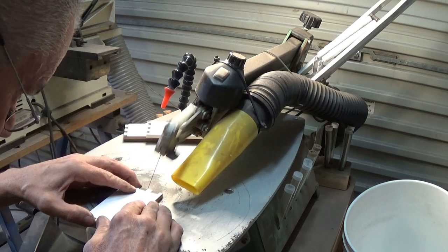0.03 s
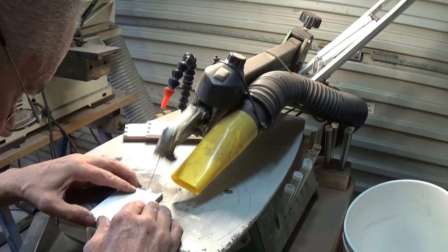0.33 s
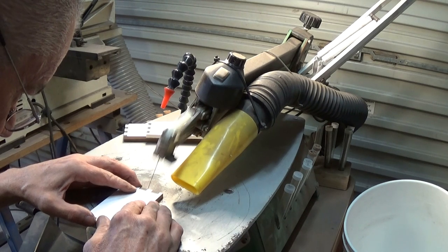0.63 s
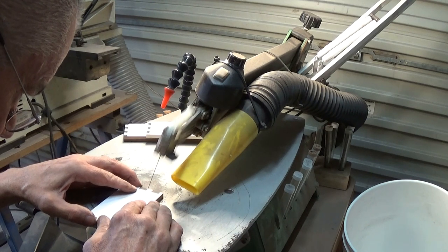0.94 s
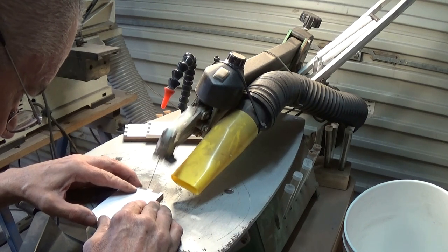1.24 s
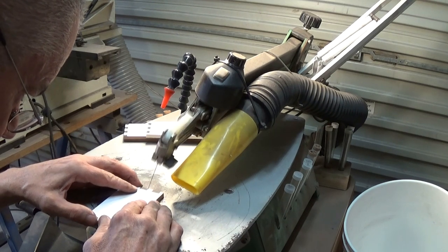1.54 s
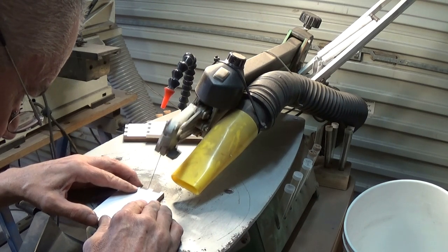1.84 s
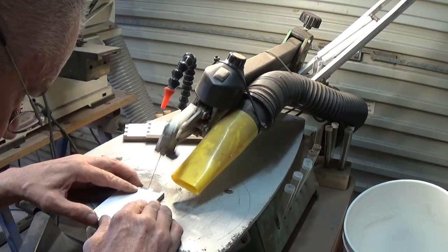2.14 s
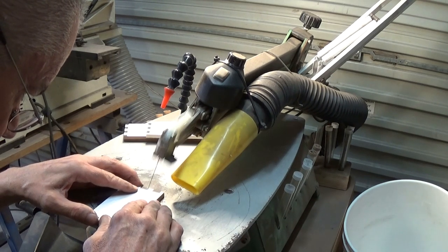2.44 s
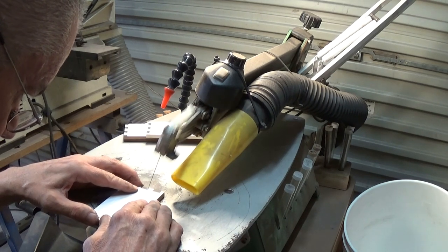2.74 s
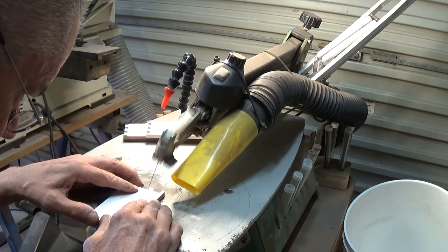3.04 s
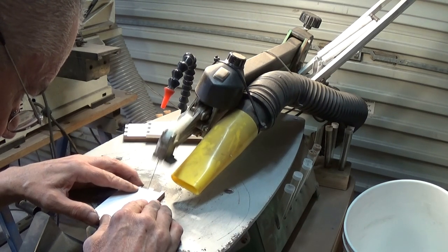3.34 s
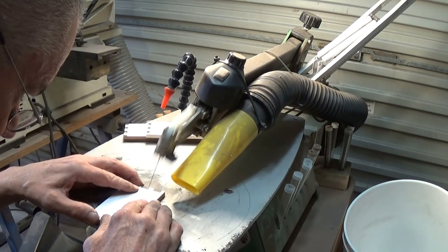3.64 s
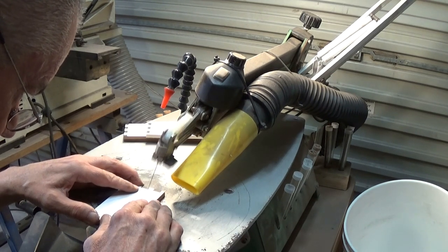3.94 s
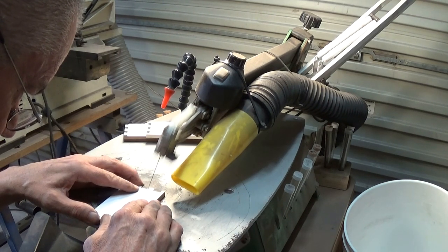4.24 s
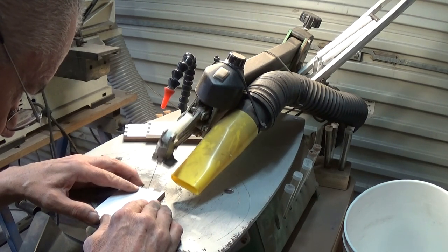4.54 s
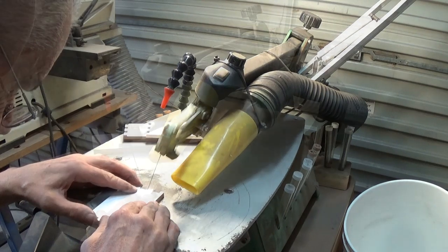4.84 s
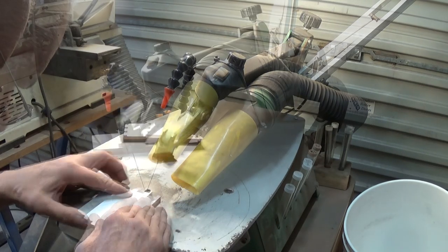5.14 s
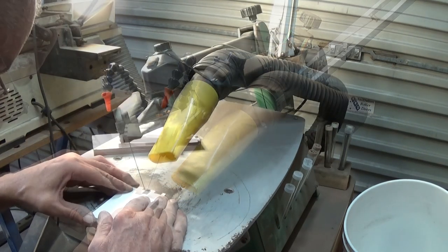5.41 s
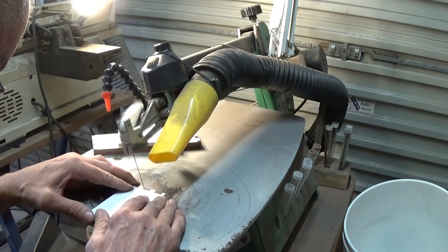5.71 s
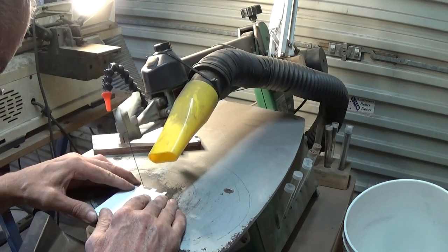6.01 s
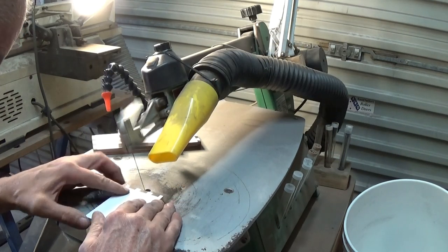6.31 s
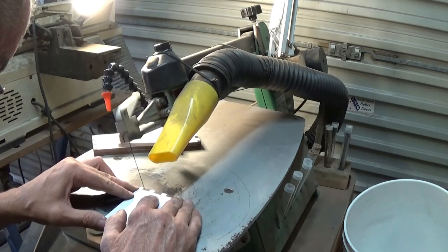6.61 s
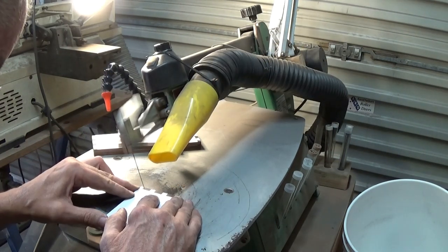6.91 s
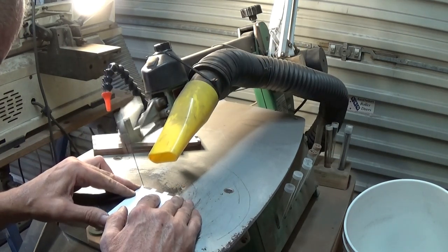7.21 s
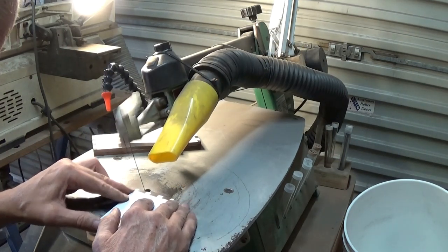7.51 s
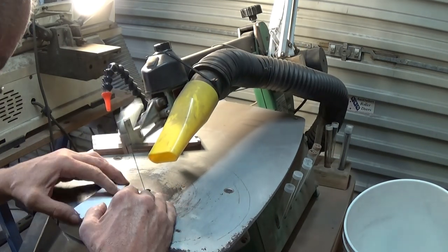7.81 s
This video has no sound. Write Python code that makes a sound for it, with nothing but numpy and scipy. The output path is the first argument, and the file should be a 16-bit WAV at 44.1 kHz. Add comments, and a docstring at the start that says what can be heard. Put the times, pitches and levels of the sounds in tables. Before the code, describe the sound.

Close up in a small workshop, a scroll saw blade rasps up and down through thin wood in rapid strokes while the frame hums, the piece rattles and fibres occasionally snap. The steady cut then fades into a sped-up version of the saw, its strokes merged into a high buzz. Three bright cutting bursts follow, the first brief and faint, before it drops to a quiet idle.

```python
"""A scroll saw cuts thin wood in a small workshop, about 16 crank turns a second: the blade rasps on each
up and down stroke, the wood chatters on the table, the frame hums at multiples of the crank speed.
At 4.7 s the blade comes free and the sound dissolves, over a second, into the same saw sped up about
six times: the strokes merge into a buzzing whine with three bursts of bright cutting."""
import sys
import numpy as np
from scipy import signal
from scipy.fft import rfft, irfft
from scipy.io import wavfile
from scipy.ndimage import uniform_filter1d

SR = 44100
rng = np.random.default_rng(int(sys.argv[2]) if len(sys.argv) > 2 else 0)


def persist_wave(psi):
    """Save psi, clipped to +-1, as 16-bit WAV."""
    counts = np.round(np.clip(psi, -1, 1) * 32767).astype(np.int16)
    wavfile.write(sys.argv[1], SR, np.atleast_2d(counts).T)


N = 346626
T = np.arange(N) / SR

# stereo width (frequency [Hz], relative side level [dB])
SPREAD = [(60, -50), (160, -42), (270, -41), (450, -26), (740, -11), (1220, -12.5), (2010, -13),
          (3330, -12), (5500, -9.5), (9080, -13), (15000, -29)]
FAST_SPREAD = [(60, -20), (200, -24), (380, -33), (1290, -51), (2380, -51), (4400, -19.5), (8120, -7.5),
               (15000, -16)]
# balance (frequency [Hz], left minus right [dB])
BALANCE = [(450, 0), (740, -.5), (1220, .3), (2010, .5), (3330, -.4), (5500, 1.8), (9080, 1.3), (15000, .5)]
# steady motor tones (frequency [Hz], rms level [dB])
MOTOR = [(100, -99), (300, -88), (500, -78.5)]
FAST_MOTOR = [(499, -95.5), (705, -86), (1122, -81.5), (1305, -88), (1803, -89), (2401, -85.5)]
# frame hum (time [s], drone level [dB], thump level [dB])
HUM_LEVELS = [(0.0, -75.5, -91), (.9, -75.5, -89), (1.1, -73, -93), (2.2, -72, -85), (3.22, -74, -88),
              (3.42, -77, -78), (4.7, -74, -79.5), (5.5, -78, -78.5)]
# brief drone dips (time [s], depth [dB])
DRONE_DIPS = [(.04, -11), (.5, -11), (3.32, -16)]
# frame vibration and blade singing (crank multiple, relative level [dB])
DRONE_ORDERS = [(5, -5), (8, -38), (9, -27), (10, -27), (11, 3), (12, -36), (13, -11), (14, -15.5),
                (15, -15), (16, -10), (17, -28)]
THUMP_ORDERS = [(4, -13), (5, 0), (6, 0), (7, 0.5), (8, -1.5)]
FAST_HUM_ORDERS = [(3, -90.5), (4, -86.5), (5, -90), (6, -80), (7, -91.5), (9, -105), (11, -102.5),
                   (12, -98.5), (13, -104), (14, -95), (20, -78)]
SING_ORDERS = [(21, 2), (32, -15), (33, -14.5), (36, -7), (41, -10)]
# splinters (time [s], peak [dB])
SNAPS = [(0.39, -31), (2.162, -38), (3.026, -32), (4.967, -43), (6.396, -55), (6.623, -64), (6.633, -61),
         (6.815, -43), (6.824, -50)]
# blade squeaks (time [s], length [s], nominal pitch [Hz], level [dB])
SQUEAKS = [(4.958, 0.08, 932, -64.5), (4.989, 0.055, 2105, -65), (5.015, 0.09, 2150, -72),
           (6.568, 0.038, 12700, -64), (7.528, 0.029, 6400, -63.5), (7.525, 0.029, 12640, -65)]

# resonances (frequency [Hz], width [Hz], relative level [dB])
FRAME_MODES = [(375.4, 8.7, 4), (347, 11, -12), (256, 26, -20.5)]
WOOD_MODES = [(480, 15, -21), (491, 51, -8), (575, 41, -8.5), (609.7, 11.7, 5), (656, 14, 3.5),
              (714, 17, -5.5), (836.4, 19.5, -1), (935.7, 19.6, 5), (1036, 57, -2), (1080, 30, -6)]
ARM_MODES = [(1246, 16, -8.5), (1335, 18.6, -1.5), (1702, 30, -10), (2343, 20, -10), (3607, 20, -13.5)]
TABLE_MODES = [(1425, 76, -3.5), (1618, 23, -2), (1663, 11, -2.5), (1849, 52, 1), (2164, 16, -1.5),
               (2296, 39, 3), (2394, 12, 3)]
GUIDE_MODES = [(2523, 21, -6), (2784, 66, -3), (3220, 65, -2), (3576, 39, 1.5), (3843, 26, 1)]
BLADE_MODES = [(3700, 31, -1), (4720, 13, 8), (4836, 41, -5.5), (4987, 110, 0.5), (5460, 89, -3.5),
               (5900, 156, -3), (6446, 11, 3.5), (6860, 49, -3.5)]
TEETH_MODES = [(7710, 130, 0), (7720, 110, -2.5), (7900, 50, -1.5), (8360, 380, -2), (8900, 160, 0.5),
               (9330, 290, 0), (10100, 520, -6), (10740, 410, -10), (12220, 350, -14), (13600, 480, -18)]
FAST_FRAME_MODES = [(1966, 88, -6), (2000, 25, -24), (2165, 40, -2.5), (2230, 27, 8)]
FAST_WOOD_MODES = [(4960, 140, -10), (5470, 200, -10), (5790, 160, -0.5), (6145, 84, 4.5), (6550, 220, -7)]
FAST_ARM_MODES = [(7290, 210, -5), (7500, 200, -12), (8140, 220, 0.5), (8750, 170, -8)]
FAST_TABLE_MODES = [(2950, 33, -9), (3110, 45, -7), (3430, 40, -1.5), (3700, 44, -9), (3568, 38, -1),
                    (3740, 31, 3.5), (3700, 50, -5.5), (4110, 44, -8), (4250, 56, -0.5)]
FAST_BLADE_MODES = [(9950, 440, -7.5), (10500, 200, -3.5), (10980, 290, -7.5), (12000, 300, -9),
                    (12900, 300, -9.5), (13820, 110, 3.5), (15100, 1200, -11.5)]
# broad spectra (frequency [Hz], relative level [dB])
WOOD_BED = [(20, -49), (60, -25), (200, -14.5), (300, -50), (450, -16), (770, -27), (1100, -39),
            (1400, -50), (2500, -82)]
TABLE_BED = [(500, -56), (900, -15.5), (1200, -13), (2000, -12.5), (2500, -38), (3500, -21), (9000, -35)]
BLADE_BED = [(700, -43.5), (1500, -23.5), (2600, -16.5), (3400, -6.5), (4300, -13), (5400, -8.5),
             (6300, -14), (7200, -9), (9000, -40), (16000, -79)]
TEETH_BED = [(2000, -35.5), (5000, -10), (7100, -14), (8700, -20), (9800, -20), (11500, -27), (13500, -24),
             (14300, -47), (16000, -33)]
FAST_BLADE_BED = [(1200, -44), (2500, -21), (5000, -23.5), (9000, -21.5), (12500, -17.5), (16000, -13.5)]
FAST_IDLE_BED = [(20, -26), (100, -28), (220, -16.5), (400, -7), (800, -5), (1200, -1), (1650, 2),
                 (2100, -0.5), (3200, 0.5), (6500, -3), (9000, -7), (16000, -4.5)]

# crank (time [s], speed [turns/s])
CRANK = [(0.0, 15.96), (0.3, 16.08), (0.5, 15.79), (0.75, 15.9), (1.0, 16.14), (1.4, 16.05), (1.6, 16.16),
         (1.9, 16.02), (2.1, 16.3), (2.5, 16.11), (3.0, 16.26), (3.3, 16.37), (3.6, 16.56), (4.0, 16.61),
         (4.4, 16.66), (4.7, 16.74), (5.4, 16.65)]
# wood feed (time [s], cutting effort [dB], return against cutting stroke [dB])
FEED = [(0.0, 1.5, -.5), (.4, 2, -0.5), (.55, 0.5, -0.5), (1.35, .5, -2), (2.8, -1.06, -0.5),
        (3.3, -1, -2.5), (3.7, -1.5, -2), (4.2, 0, -1), (4.42, -3, 0), (4.58, -2, 0.5), (4.7, -3.5, 2)]
# play of the wood under the hands (time [s], looseness [dB])
LOOSENESS = [(0.0, 4), (.1, -2), (.35, -3.5), (.42, 1.5), (.7, -.5), (.9, 1), (1.15, -1.5), (1.33, 2.5),
             (1.55, -1), (1.83, 2.5), (2.35, -2), (2.65, 2), (2.88, -1), (3.1, 2.5), (3.6, -0.5),
             (3.85, -3), (4.2, -3), (4.7, -6)]
# wood presses the blade sideways, the arm rings (start [s], end [s], boost [dB])
BINDS = [(0.024, 0.3, 3), (3.198, 4.33, 5)]
# shaken parts, by name (level [dB], effort slope [dB/dB], looseness slope [dB/dB], free level [dB])
PARTS = dict(rasp=(-48.5, 1, 0, -66), blade=(-50.5, 1, 0, -70), table=(-52, 1, 0.78, -67),
         arm=(-56.5, 0.5, -0.37, -72), chatter=(-58, -0.43, 1.5, -69.5), boom=(-66, -1, 1.6, -72.5))
# sped-up cuts (start [s], end [s], teeth hiss [dB], arm rasp [dB], wood whistle [dB], wood rattle [dB],
# frame buzz [dB], blade singing [dB], entry rasp boost [dB], exit rasp boost [dB], rattle peak [s])
FAST_CUTS = [(4.848, 5.132, -51, -60, -57.5, -62.5, -64, -80, 7, 7, 4.93),
             (5.509, 6.28, -49.5, -60.5, -57.5, -60, -63, -65.5, 6.5, 1, 6.0),
             (6.642, 7.48, -50, -58, -55.5, -61.5, -62, -79, 5, 11, 7.18)]

CUT_END_S, CUT_RELEASE_S, CLEARING_DB_PER_S = 4.685, 0.081, 15
DISSOLVE_START_S, DISSOLVE_END_S = 4.67, 5.664
FAST_CRANK_HZ, FAST_SAG_HZ = 105.1, 0.75
IDLE_DB, WHINE_FREE_DB, WHINE_LOAD_DB, WHINE_LAG_S = -68.5, -79, 10, 0.26
BRUSH_S, ATTACK_S, RELEASE_S, SETTLE_S = 0.053, 0.023, 0.02, 0.14
BRUSH_DB, SAG_DB, LET_GO_DB, FREE_DB = -13, -1.5, -18.5, -32.5
ENTRY_S, EXIT_S, EDGE_WIDTH_S = 0.081, 0.035, 0.038
WHISTLE_ARCH_DB, SING_ARCH_DB, RATTLE_SWELL_DB = 6, 8, 11
CUTOFF_HZ = 15780


def amp(db):
    """Decibels to gain."""
    return 10 ** (np.asarray(db) / 20)


def unit(x):
    """Scales to rms 1."""
    return x / np.sqrt(np.mean(x ** 2) + 1e-20)


def curves(rows):
    """Each value column of a time table at every sample."""
    times_s, *columns = np.transpose(rows)
    return [np.interp(T, times_s, column) for column in columns]


def ramp(start_s, end_s):
    """Linear rise from 0 to 1."""
    return np.clip((T - start_s) / max(end_s - start_s, .001), 0, 1)


def bump(at_s, width_s):
    """Bell of height 1."""
    return np.exp(-((T - at_s) / width_s) ** 2)


def spectrum_db(points, hz):
    """Interpolates a spectrum over log frequency."""
    points_hz, db = np.transpose(points)
    return np.interp(np.log(hz + 1), np.log(points_hz + 1), db)


def wander(rate_hz):
    """Smooth random curve, rms 1."""
    return unit(np.interp(T * rate_hz, np.arange(4000), rng.standard_normal(4000)))


def tones(turns, orders):
    """Sines at multiples of a running phase."""
    return sum(np.sqrt(2) * amp(db) * np.cos(2 * np.pi * k * turns) for k, db in orders)


def add(mix, at_s, sound):
    """Mixes a sound in at a time."""
    part = mix[round(at_s * SR):][:len(sound)]
    part += sound[:len(part)]


def body(x, modes=(), bed=((1, -90), (2, -90)), size=8192):
    """Rings x through resonances on a broad spectrum; minimum phase, rms 1."""
    hz = np.fft.rfftfreq(size, 1 / SR)
    power = amp(spectrum_db(bed, hz)) ** 2
    for mode_hz, width_hz, db in modes:
        detune = (2 * (hz - mode_hz) / width_hz) ** 2
        power = power + amp(db) ** 2 / (1 + detune) / (1 + detune / 60)
    cepstrum = irfft(np.log(power) / 2)[:size // 2]
    cepstrum[1:] *= 2
    impulse = irfft(np.exp(rfft(cepstrum, size)))
    return unit(signal.oaconvolve(x, impulse)[:N])


def workshop(x, t60_s, size=12000):
    """Dense short reflections from table and walls."""
    t = T[:size]
    taps = rng.standard_normal(size) * (rng.random(size) < .06) * amp(-60 * t / t60_s) * (t > .002)
    return signal.oaconvolve(x, taps / np.linalg.norm(taps))[:N]


def place(dry, spread, balance=None):
    """Close, central source; the room widens the treble a little."""
    hz = np.fft.rfftfreq(N, 1 / SR)
    treble = signal.sosfilt(signal.butter(2, 1500, "high", fs=SR, output="sos"), dry)
    mid = rfft(dry + amp(-14.5) * workshop(treble, t60_s=0.14))
    side = rfft(workshop(dry, t60_s=0.13)) * amp(spectrum_db(spread, hz) - 1.0)
    lean = amp(spectrum_db(balance, hz) / 2) if balance else 1
    return irfft(np.array([(mid + side) * lean, (mid - side) / lean]), N)


def frame_hum(turns):
    """The crank shakes the frame: a fluttering drone and a low thump."""
    drone_db, thump_db = curves(HUM_LEVELS)
    drone_db += sum(db * bump(at_s, width_s=0.027) for at_s, db in DRONE_DIPS)
    drone = amp(drone_db + 1.7 * wander(15)) * tones(turns + 0.0059 * wander(17), DRONE_ORDERS)
    thump = amp(thump_db + 1.3 * wander(10)) * tones(turns + 0.057, THUMP_ORDERS)
    return drone + thump


def fast_running(turns, force):
    """Idle rustle of the sped-up saw; whine and hum build under load."""
    load_db = WHINE_LOAD_DB * sum(
        ramp(start_s - BRUSH_S, start_s + WHINE_LAG_S) * (1 - ramp(end_s + RELEASE_S, end_s + SETTLE_S))
        for start_s, end_s, *_ in FAST_CUTS)
    whine_db = WHINE_FREE_DB + load_db + 2.8 * wander(40)
    whine = amp(whine_db) * tones(turns + 0.0078 * wander(70), [(10, 0), (11, -10)])
    rustle = amp(IDLE_DB) * body(force * scrape(turns, 0.38, 5.3, size=420), bed=FAST_IDLE_BED)
    hum = amp(0.36 * load_db - 3.1 + 1.4 * wander(21)) * tones(turns, FAST_HUM_ORDERS)
    return whine + rustle + hum


def snaps():
    """Wood fibres snap at the teeth: short bright noise bursts."""
    out, t = np.zeros(N), T[:800]
    band = signal.butter(2, [4000, 11000], "band", fs=SR, output="sos")
    for at_s, db in SNAPS:
        snap = signal.sosfilt(band, rng.standard_normal(len(t)) * np.exp(-t / 0.0032))
        add(out, at_s, amp(db) * snap / abs(snap).max())
    return out


def squeaks():
    """The blade squeaks in the kerf: brief wavering tones."""
    out = np.zeros(N)
    for at_s, length_s, nominal_hz, db in SQUEAKS:
        count = int(length_s * SR)
        cycles = np.cumsum(nominal_hz * (1 + 0.0042 * wander(450)[:count])) / SR
        add(out, at_s, np.hanning(count) * tones(cycles, [(0.96, db)]))
    return out


def wood_grain(x, depth_db, frames, bins):
    """New grain shifts the colour: random level patches over time and frequency."""
    window = dict(nperseg=512, noverlap=384)
    spectra = signal.stft(x, **window)[2]
    patches = rng.standard_normal(spectra.shape)
    for axis, span in enumerate((bins, frames)):
        patches = uniform_filter1d(patches, span, axis)
    return unit(signal.istft(spectra * amp(depth_db * unit(patches)), **window)[1][:N])


def scrape(turns, repeat, grain_db, size=2720):
    """Tooth impacts: the share `repeat` recurs each turn, the rest are grains of random size."""
    pattern = irfft(np.exp(2j * np.pi * rng.random(size // 2)), 4 * size)
    teeth = np.interp(turns % 1, np.arange(4 * size) / (4 * size), pattern)
    grains = rng.standard_normal(N) * amp(grain_db * np.minimum(rng.exponential(1, N), 5))
    return np.sqrt(repeat) * unit(teeth) + np.sqrt(1 - repeat) * unit(grains)


def strokes(turns, lag_turns, sharpness, floor, back_db, catch_db, bite, late_turns=0, slide_db=0):
    """Cutting force follows blade speed; teeth slide, then catch; the return can bite late."""
    phase = turns - lag_turns - late_turns * np.sin(np.pi * (turns - lag_turns)) ** 2
    stroke = np.round(2 * phase).astype(int)
    sliding = np.clip((stroke - 2 * phase - .14) / .04, 0, 1)
    stroke_db = back_db * (stroke % 2) + catch_db[stroke % len(catch_db)] + slide_db * sliding
    force = abs(np.cos(2 * np.pi * phase)) ** sharpness * amp(stroke_db)
    return np.sqrt(bite * unit(force) ** 2 + floor ** 2 + 1 - bite) / np.sqrt(1 + floor ** 2)


def fast_cut_db(start_s, end_s, hiss_db, rasp_db, whistle_db, rattle_db, buzz_db, sing_db,
                entry_db, exit_db, rattle_s):
    """Levels through one cut: the teeth brush, bite, ease off, let go; the wood settles."""
    brush_s, let_go_s = start_s - BRUSH_S, end_s + RELEASE_S
    press_db = curves([(brush_s - ATTACK_S, FREE_DB), (brush_s, BRUSH_DB),
                       (start_s - ATTACK_S, BRUSH_DB), (start_s, 0), (end_s, SAG_DB),
                       (let_go_s, LET_GO_DB), (let_go_s + SETTLE_S, FREE_DB)])[0]
    arch = np.sqrt(abs(np.sin(np.pi * ramp(start_s, end_s))))
    edges_db = entry_db * bump(start_s + ENTRY_S, EDGE_WIDTH_S)
    edges_db += exit_db * bump(end_s - EXIT_S, EDGE_WIDTH_S)
    return [hiss_db + press_db,
            rasp_db + 0.91 * press_db + edges_db,
            whistle_db + 0.72 * press_db + WHISTLE_ARCH_DB * (arch - 1),
            rattle_db + 0.39 * press_db + RATTLE_SWELL_DB * (bump(rattle_s, width_s=0.31) - 1),
            buzz_db + 0.7 * press_db,
            sing_db + 0.78 * press_db + SING_ARCH_DB * (arch - 1)]


def fast_cutting(turns, force):
    """Sped-up cuts: teeth hiss, arm rasps, wood whistles and rattles, frame buzzes, blade sings."""
    levels_db = np.max([fast_cut_db(*cut) for cut in FAST_CUTS], axis=0)
    teeth = force * amp(1.8 * wander(22)) * scrape(turns, 0.12, 2.7, size=420)
    hiss = wood_grain(body(teeth, FAST_BLADE_MODES, FAST_BLADE_BED), depth_db=2.3, frames=4, bins=8)
    arm_force = force * amp(2.5 * wander(70) + 1.36 * wander(20))
    rasp = body(arm_force * scrape(turns, 0.68, 3.1, size=420), FAST_ARM_MODES)
    wood_force = force * amp(2.7 * wander(60) + 0.6 * wander(20))
    whistle = body(wood_force * scrape(turns, 0.49, 2.6, size=420), FAST_WOOD_MODES)
    knocks = scrape(turns, 0.72, 2.5, size=420)
    rattle = body(force * knocks * amp(2.9 * wander(45) + 1.3 * wander(20)), FAST_TABLE_MODES)
    buzz = body(knocks * amp(4.2 * wander(22)), FAST_FRAME_MODES)
    sing = amp(2.1 * wander(30)) * tones(turns, SING_ORDERS)
    return sum(amp(db) * part for db, part in zip(levels_db, (hiss, rasp, whistle, rattle, buzz, sing)))


def fast_saw():
    """Sped up, the strokes merge into a buzz; each bite brakes the crank."""
    braking = sum(ramp(start_s - SETTLE_S, start_s) * (1 - ramp(start_s, end_s) ** 2)
                  for start_s, end_s, *_ in FAST_CUTS)
    crank_hz = (FAST_CRANK_HZ - FAST_SAG_HZ * braking) * (1 + .0022 * wander(35))
    turns = np.cumsum(crank_hz) / SR
    catch_db = 1.4 * rng.standard_normal(2000)
    force = strokes(turns, 0, sharpness=2.0, floor=1.4, back_db=-2.6, catch_db=catch_db, bite=0.86)
    return fast_cutting(turns, force) + fast_running(turns, force) + tones(T, FAST_MOTOR)


def cutting(turns):
    """The teeth rasp twice a turn and shake blade, guide, table, arm, wood and frame."""
    effort_db, back_db = curves(FEED)
    loose_db = curves(LOOSENESS)[0]
    free = ramp(CUT_END_S, CUT_END_S + CUT_RELEASE_S)
    bite = 0.98 * (1 - free) + 0.27 * free
    gain = {part: amp((db + by_effort * effort_db + by_loose * loose_db) * (1 - free) + free_db * free)
            for part, (db, by_effort, by_loose, free_db) in PARTS.items()}

    catch_db = 0.69 * rng.standard_normal(200)  # no two strokes catch alike
    snag = amp(1.27 * wander(450))  # single teeth snag
    drag_catch_db = catch_db + 0.27 * rng.standard_normal(200)
    teeth = snag * strokes(turns, -0.028, 4.7, 0.24, back_db - 0.5, catch_db, bite, late_turns=0.053)
    drag = snag * strokes(turns, -0.0095, 2.75, 0.41, 0.17 * back_db, drag_catch_db, bite,
                          late_turns=0.016)
    push = strokes(turns, 0.016, 2.2, 0.62, 1.14 * back_db, catch_db, bite,
                   late_turns=0.033, slide_db=-13)
    slap = strokes(turns, 0.01, 0.62, 0.57, back_db, catch_db, bite)
    # the return stroke lifts the wood against the guide
    lift = strokes(turns, 0, 2.2, 0.21, 11.7, catch_db, bite, slide_db=-8)

    rasp = body(teeth * scrape(turns, repeat=0.23, grain_db=2.5), TEETH_MODES, TEETH_BED)
    rasp = wood_grain(rasp, depth_db=1.36, frames=7, bins=27)
    rubbing = scrape(turns, 0.16, 2.7)
    blade = body(drag * rubbing, BLADE_MODES, BLADE_BED)
    guide = 0.57 * body(lift * rubbing, GUIDE_MODES)
    blade = wood_grain(blade + guide, depth_db=1.22, frames=10, bins=5)
    table = body(push * scrape(turns, 0.21, 3.8), TABLE_MODES, TABLE_BED)
    table = wood_grain(table, depth_db=2.77, frames=21, bins=3)
    bind_db = sum(db * (ramp(start_s - 0.038, start_s) - ramp(end_s, end_s + 0.038))
                  for start_s, end_s, db in BINDS)
    arm = body(push * amp(bind_db + 0.67 * wander(8.2)) * scrape(turns, 0.59, 4.6), ARM_MODES)
    chatter = body(slap * scrape(turns, 0.44, 2.5), WOOD_MODES, WOOD_BED)
    boom = body(scrape(turns, 0.93, 3), FRAME_MODES)

    treble = gain["rasp"] * rasp + gain["blade"] * blade + gain["table"] * table + gain["arm"] * arm
    bass = gain["chatter"] * chatter + gain["boom"] * boom
    clearing_db = -CLEARING_DB_PER_S * np.maximum(T - CUT_END_S, 0)  # the freed blade rubs ever less
    return amp(clearing_db) * treble + bass


def saw():
    """Normal speed: one crank drives blade and frame over steady motor tones."""
    turns = 0.245 + np.cumsum(curves(CRANK)[0]) / SR
    return cutting(turns) + frame_hum(turns) + tones(T, MOTOR)


def scene():
    """The saw dissolves into its sped-up self in the workshop."""
    dissolve = ramp(DISSOLVE_START_S, DISSOLVE_END_S)
    normal = place(saw() * (1 - dissolve) + snaps() + squeaks(), SPREAD, BALANCE)
    fast = place(fast_saw() * dissolve ** 1.07, FAST_SPREAD)
    return normal + fast


def record(dry):
    """Steep low-pass."""
    taps = signal.firwin(1023, CUTOFF_HZ, window=("kaiser", 9), fs=SR)
    return signal.oaconvolve(dry, taps[None], "same")


dry = scene()
out = record(dry)
persist_wave(out)
```